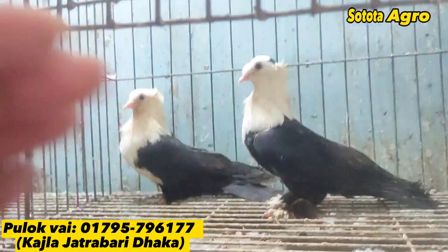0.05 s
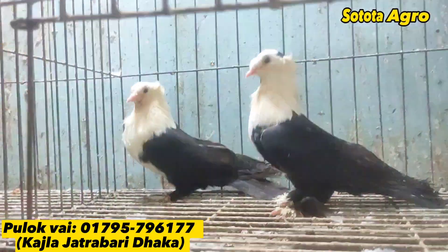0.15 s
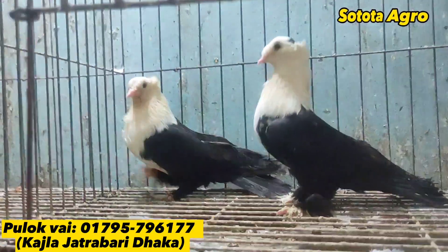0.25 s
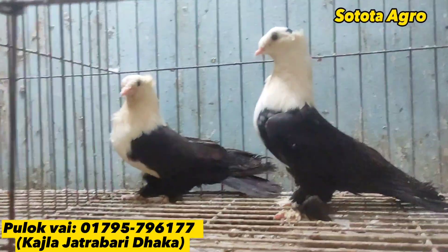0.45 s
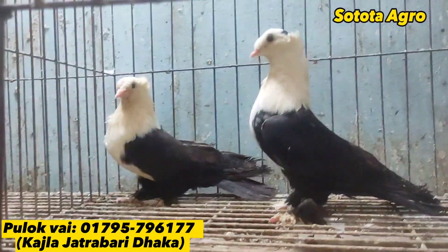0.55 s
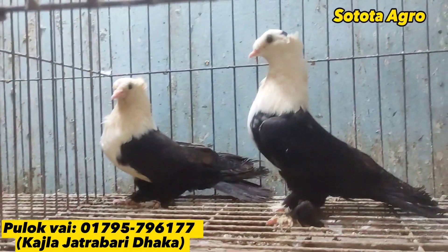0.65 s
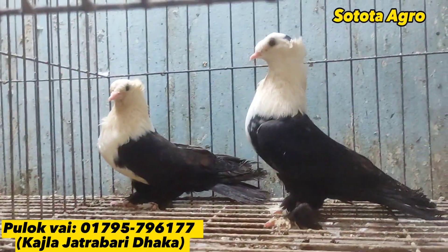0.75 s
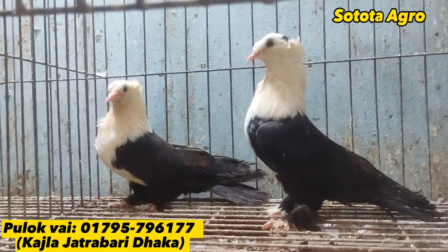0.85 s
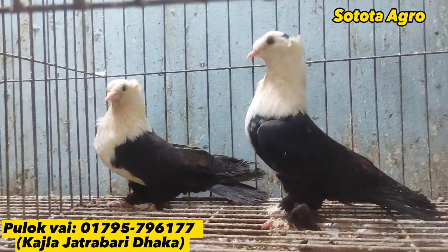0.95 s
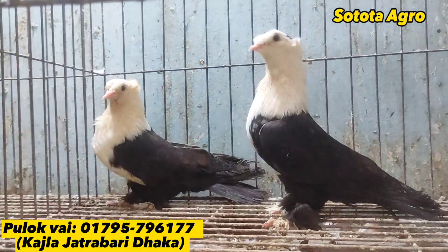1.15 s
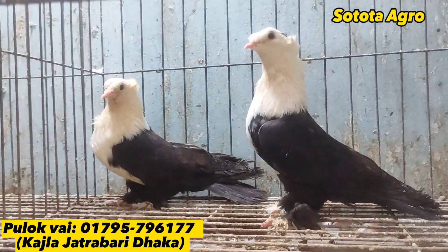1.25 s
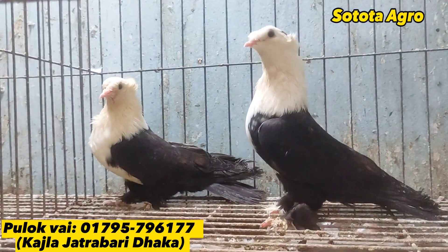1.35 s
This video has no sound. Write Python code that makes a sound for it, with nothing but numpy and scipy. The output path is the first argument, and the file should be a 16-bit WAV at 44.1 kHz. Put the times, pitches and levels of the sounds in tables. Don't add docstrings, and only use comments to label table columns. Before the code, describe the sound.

Pigeons coo close to the microphone: a quick throbbing purr first, then a louder rolling coo that swells and fades, with faint feather brushes, tiny wire ticks and thin distant chirps in a small hard-walled loft.

```python
import sys
import numpy as np
from scipy import signal
from scipy.io import wavfile
from scipy.ndimage import uniform_filter1d

SR = 44100
rng = np.random.default_rng(int(sys.argv[2]) if len(sys.argv) > 2 else 0)


def undo_db(level):
    steps = np.asarray(level, float) / 20
    return 10 ** steps


def digitize_waveform(pressure):
    field = np.atleast_2d(pressure).T
    bounded = np.clip(field, -1, 1)
    quanta = np.round(bounded * 32767).astype(np.int16)
    wavfile.write(sys.argv[1], SR, quanta)


N = 61739


def evened(x):
    return x / np.sqrt(np.mean(x ** 2) + 1e-20)


def drift(size, hz):
    slow = signal.butter(2, hz, fs=SR, output="sos")
    return evened(signal.sosfiltfilt(slow, rng.standard_normal(size + 4000))[2000:-2000])


def resonate(x, hz, width_hz):
    turn = np.exp(2j * np.pi * np.cumsum(hz * np.ones(len(x))) / SR)
    r = np.exp(-np.pi * width_hz / SR)
    smoothed = signal.lfilter([(1 - r) ** 2], [1, -2 * r, r * r], x / turn)
    return 2 * (turn * smoothed).real


def add(mix, start_s, sound):
    at = round(start_s * SR)
    part = mix[max(at, 0):][:len(sound) + min(at, 0)]
    part += sound[max(-at, 0):][:len(part)]


def patchy(spectrum, level_db, patch_db):
    hz = np.fft.rfftfreq(1024, 1 / SR)
    real, imag, patches = rng.standard_normal((N // 256 + 5, 513, 3)).T
    patches = uniform_filter1d(patches, 10, 0)
    patches = evened(uniform_filter1d(patches, 10, 1))
    f, db = np.transpose(spectrum)
    colour = np.interp(np.log(hz + 1), np.log(f), db, left=-90, right=-90)[:, None]
    bins = (real + 1j * imag) * undo_db(colour + patch_db * patches)
    noise = signal.istft(bins, nperseg=1024, noverlap=768)[1][:N]
    return undo_db(level_db) * evened(noise)


def distant_notes(table, fuzz_hz, clear):
    out = np.zeros(N)
    for start, length, db, hz, end_hz in table:
        u = np.linspace(0, 1, round(length * SR))
        pitch = hz + (end_hz - hz) * u
        tone = np.sqrt(2) * np.sin(2 * np.pi * np.cumsum(pitch) / SR)
        blur = evened(resonate(rng.standard_normal(N)[:len(u)], pitch, fuzz_hz))
        swell = np.sin(np.pi * u ** .8) ** .6
        add(out, start, undo_db(db + 3) * swell * (clear * tone + (1 - clear) * blur))
    return out


def throat(hz, level):
    overtone_db, breath_db, breath_width_hz = -36, -16, 200
    turn = 2 * np.pi * np.cumsum(hz) / SR
    air = resonate(rng.standard_normal(len(hz)), hz, breath_width_hz)
    air = evened(resonate(air, hz, 2 * breath_width_hz))
    return level * (np.sin(turn) + undo_db(overtone_db) * np.sin(2 * turn) + undo_db(breath_db) * air)


def coo(table):
    gain_db, swell_edge, sag, wobble = -0.65, 1.9, .02, .05
    t = np.arange(N) / SR
    centre, db, hz, length = np.transpose(table)[:, :, None]
    u = np.clip((t - centre) / length, -2, 2)
    swell = undo_db(db + gain_db) * np.exp(-np.abs(swell_edge * u) ** 2.5)
    power = swell ** 2 + 1e-30
    total = power.sum(0)
    pitch = (power * hz * (1 - sag * u)).sum(0) / total
    return throat(pitch * (1 + wobble * drift(N, 60)), np.sqrt(total))


# frequency in Hz, rms level in dB.
HUM_PARTIALS = [(49, -37), (146, -49.5)]
# time in seconds, level in dB.
HUM_LEVEL = [(0.0, -70), (0.185, -53), (1.4, -57.5)]


def machine_hum():
    level_db = np.interp(np.arange(N) / SR, *np.transpose(HUM_LEVEL))
    swell = undo_db(level_db + 47.5 + 2.5 * drift(N, 4.8))
    turn = 2 * np.pi * np.cumsum(1 + 0.036 * drift(N, 16)) / SR
    return swell * sum(np.sqrt(2) * undo_db(db) * np.sin(hz * turn) for hz, db in HUM_PARTIALS)


# frequency in Hz, density in dB per Hz.
AIR_COLOUR = [(500, -28.5), (620, -10.5), (900, -13.5), (2200, -29), (4400, -32), (5200, -37.5),
              (9000, -43), (15600, -56.5)]


def loft_air():
    return patchy(AIR_COLOUR, -59, 2.6)


# frequency in Hz, density in dB per Hz.
MURMUR_COLOUR = [(12, -33), (20, 3), (62, -14), (103, -24), (229, -11), (333, 2), (700, -20.5), (910, -58),
                 (1540, -120)]


def flock_murmur():
    return patchy(MURMUR_COLOUR, -38, 2.2)


# start in seconds, length in seconds, level in dB, pitch in Hz, end pitch in Hz.
WHISTLES = [(-.05, .36, -57, 2965, 2945), (.16, .26, -59.5, 2965, 2955), (.31, .15, -59, 2830, 2780),
            (.49, .1, -67, 2805, 2790), (.04, .09, -66, 3510, 3500), (.15, .14, -68, 2420, 2425),
            (.865, .08, -58, 3610, 3650), (.955, .065, -62, 4550, 4505), (1.012, .05, -55, 4260, 4170),
            (.98, .07, -68, 3420, 3390), (.29, .12, -64, 3460, 3440)]


def whistles():
    return distant_notes(WHISTLES, fuzz_hz=80, clear=.62)


# start in seconds, length in seconds, level in dB, pitch in Hz, end pitch in Hz.
SCRATCHY_CHIRPS = [(.18, .14, -65, 3520, 3470), (.11, .11, -64, 4120, 4180), (.22, .15, -62.5, 4180, 4020),
                   (.45, .1, -64, 4050, 4150), (.54, .19, -63, 3900, 4000), (.60, .06, -59, 4000, 4000),
                   (.12, .2, -68, 2020, 2080), (.89, .05, -64, 3500, 3550), (.93, .04, -64, 4980, 4880),
                   (1.05, .09, -57, 4180, 4050), (1.05, .1, -58, 3990, 3750), (1.04, .1, -63, 3300, 3330),
                   (.11, .07, -75, 8900, 8900), (.24, .2, -68, 4500, 4450), (0, .2, -66, 3300, 3500)]


def chirps():
    return distant_notes(SCRATCHY_CHIRPS, fuzz_hz=280, clear=.12)


# start in seconds, length in
# seconds, level in dB, pitch in Hz, end pitch in Hz.
FAR_NOTES = [(.055, .04, -35, 485, 478), (.12, .035, -35, 495, 500), (.155, .05, -36, 488, 482),
             (.22, .13, -37, 480, 490), (.094, .04, -31, 620, 614), (.125, .035, -36, 640, 680),
             (.16, .05, -41, 670, 655), (.07, .14, -36, 300, 325), (.435, .07, -36, 685, 665),
             (.50, .065, -40, 615, 595), (.615, .035, -42, 745, 750), (.10, .18, -52, 780, 800),
             (.49, .05, -50, 790, 850), (1.34, .05, -40, 555, 550), (1.12, .1, -48, 580, 575),
             (.49, .065, -60, 1460, 1465), (.64, .34, -32, 285, 265), (.555, .05, -43, 680, 650),
             (.48, .2, -39, 450, 470), (.28, .04, -39, 560, 570), (.21, .08, -44, 650, 640),
             (1.235, .05, -50, 800, 810), (1.28, .07, -54, 900, 930), (1.235, .035, -52, 1390, 1370)]


def far_pigeons():
    return distant_notes(FAR_NOTES, fuzz_hz=80, clear=.68)


# centre in seconds, peak in dB, pitch in Hz, length in seconds.
PURR_THROBS = [(0.215, -21.5, 342.6, 0.021), (0.23, -17, 315.2, 0.012), (0.242, -14.5, 335.3, 0.011),
               (0.261, -16, 337.6, 0.024), (0.278, -13.5, 323.3, 0.011), (0.289, -17, 353, 0.018),
               (0.303, -16, 338.5, 0.026), (0.314, -12, 335.5, 0.0061), (0.325, -19.5, 340.1, 0.01),
               (0.336, -15, 340.7, 0.02), (0.348, -15.5, 331.1, 0.011), (0.372, -18.5, 317.8, 0.031),
               (0.39, -26.5, 299, 0.0056), (0.405, -24, 333.3, 0.0084), (0.418, -29.5, 340.3, 0.017),
               (0.428, -22, 337, 0.011), (0.435, -30.5, 329.8, 0.0061), (0.445, -21, 311.6, 0.014),
               (0.454, -19, 325, 0.007), (0.46, -21.5, 369.6, 0.0043), (0.472, -16, 336.2, 0.012),
               (0.482, -16.5, 312.8, 0.0095), (0.492, -16.5, 315.2, 0.017), (0.505, -13, 343.8, 0.0079),
               (0.522, -19, 329.4, 0.018), (0.536, -22, 315.3, 0.009), (0.542, -28, 334, 0.0093),
               (1.328, -31.5, 351.5, 0.022), (1.348, -20.5, 355.3, 0.011), (1.363, -22, 359.8, 0.012),
               (1.373, -22.5, 369.5, 0.011), (1.383, -22.5, 374.4, 0.011), (1.393, -23, 333, 0.014)]


def purring_pigeon():
    return coo(PURR_THROBS)


# time in seconds, peak in dB, brightness in kHz.
WIRE_TICKS = [(.2162, -56, 4), (.2431, -53, 4), (.266, -51, 5), (.2868, -52, 4), (.3508, -51, 4),
              (.441, -57, 6), (.5415, -57, 6), (.5612, -58, 8), (.631, -49, 6), (.671, -48, 4),
              (.696, -53, 5), (.732, -55, 3), (.738, -55, 3.5), (.742, -57, 5), (.756, -47, 4.5),
              (.763, -53, 5), (.7958, -49, 5), (.7978, -45, 5), (.8008, -54, 7), (.816, -49, 4.5),
              (.823, -51, 4.5), (.8408, -49, 4.5), (.843, -56, 8), (.8515, -58, 9), (.8608, -46, 7),
              (.8655, -54, 5), (.868, -47, 7), (.9262, -41, 4), (.929, -52, 4), (.946, -55, 4.5),
              (.986, -55, 6), (.9978, -57, 6), (1.023, -58, 6), (1.0508, -55, 6), (1.0575, -59, 8),
              (1.1162, -56, 6)]


def ticks():
    gain_db, ring_cycles, rattle, rattle_s = 10.5, .4, .2, .001
    out, t = np.zeros(N), np.arange(200) / SR
    noises = rng.standard_normal((len(WIRE_TICKS), 200))
    for (s, db, khz), noise in zip(WIRE_TICKS, noises):
        turns = 700 * khz * t
        ring = np.sign(noise[0]) * np.sin(2 * np.pi * turns) * np.exp(-turns / ring_cycles)
        snap = undo_db(db + gain_db) * (ring + rattle * noise * np.exp(-t / rattle_s))
        add(out, s, signal.lfilter(*signal.butter(4, 1900 * khz, fs=SR), snap))
    return out


# start in seconds, length in seconds, level in dB, centre in Hz, top in Hz.
WING_STROKES = [
    (0.237, 0.12, -56.5, 2610, 8000),
    (0.47, 0.11, -60, 4080, 8190),
    (0.596, 0.13, -44, 1204, 3000),
    (0.597, 0.084, -66, 6680, 8210),
    (0.695, 0.081, -49, 1180, 1612),
    (1.221, 0.16, -47, 1341, 1850),
    (0.247, 0.12, -67.5, 7000, 8200),
    (0.739, 0.28, -56.5, 1200, 1600),
]


def wings():
    out = np.zeros(N)
    for start, length, db, hz, top_hz in WING_STROKES:
        u = np.linspace(0, 1, round(length * SR))
        grain = (rng.standard_normal(N) * undo_db(3 * drift(N, 390)))[:len(u)]
        band = signal.butter(1, [0.75 * hz, 1.125 * hz], "band", fs=SR, output="sos")
        top = signal.butter(6, top_hz, fs=SR, output="sos")
        puff = evened(signal.sosfilt(top, signal.sosfilt(band, grain)))
        stroke = np.minimum(u / .22, 1) * np.cos(np.pi / 2 * u ** 1.3)
        add(out, start, undo_db(db) * puff * stroke)
    return out


# centre in seconds, peak in dB, pitch in Hz, length in seconds.
ROLL_SWELLS = [(0.554, -13.5, 307.2, 0.01), (0.563, -13.5, 304.1, 0.013), (0.58, -14.5, 357.7, 0.007),
               (0.591, -23, 342.3, 0.011), (0.607, -19, 330.8, 0.011), (0.616, -21, 344.2, 0.0052),
               (0.624, -14, 317.2, 0.0063), (0.63, -18, 284.8, 0.0064), (0.637, -16, 288, 0.0092),
               (0.648, -19, 383.6, 0.01), (0.657, -14, 397, 0.0074), (0.67, -10, 366.7, 0.0096),
               (0.682, -17, 354.6, 0.007), (0.688, -17.5, 331.8, 0.0044), (0.697, -16.7, 364.4, 0.012),
               (0.713, -14, 363.7, 0.01), (0.737, -8, 382.4, 0.026), (0.755, -8, 375.3, 0.016),
               (0.772, -11, 377.8, 0.0097), (0.792, -4, 377.9, 0.018), (0.819, -6.5, 379, 0.02),
               (0.833, -19, 337.7, 0.006), (0.838, -27, 352.7, 0.006), (0.845, -9, 364.6, 0.0062),
               (0.86, -10.1, 343.2, 0.019), (0.879, -21, 339.6, 0.012), (0.893, -14, 387.8, 0.017),
               (0.905, -12.5, 397.3, 0.0054), (0.913, -12, 394.9, 0.0087), (0.928, -6.5, 385.2, 0.015),
               (0.942, -10.5, 383.2, 0.008), (0.953, -17, 348, 0.006), (0.978, -11.5, 373.1, 0.02),
               (1.004, -20.5, 383.2, 0.032), (1.022, -24.0, 412.4, 0.015), (1.048, -16, 405, 0.032),
               (1.087, -20.5, 369.2, 0.015), (1.104, -26, 378, 0.012), (1.117, -16.5, 369.8, 0.015)]


def rolling_pigeon():
    return coo(ROLL_SWELLS)


def crop(voice):
    return signal.sosfilt(signal.butter(2, (200, 680), "band", fs=SR, output="sos"), voice)


def loft(x):
    t60_s = .2
    taps, at = np.zeros(SR // 2), np.arange(300, SR // 2 - 20, 20)
    signs = rng.choice([-1., 1.], len(at))
    taps[at + rng.integers(0, 20, len(at))] = signs * undo_db(-60 * at / SR / t60_s)
    return signal.fftconvolve(x, taps / np.linalg.norm(taps))[:N]


def scene():
    near = crop(purring_pigeon() + rolling_pigeon())
    far = far_pigeons() + whistles() + wings() + chirps()
    birds = near + far
    reflected = undo_db(-17) * loft(birds)
    wire = ticks()
    background = machine_hum() + loft_air() + flock_murmur()
    return (birds + reflected + wire + background)[None]


def roll_off(x):
    return signal.sosfilt(signal.butter(12, 15600, fs=SR, output="sos"), x)


def record(dry):
    return roll_off(dry)


dry = scene()
out = record(dry)
digitize_waveform(out)
```